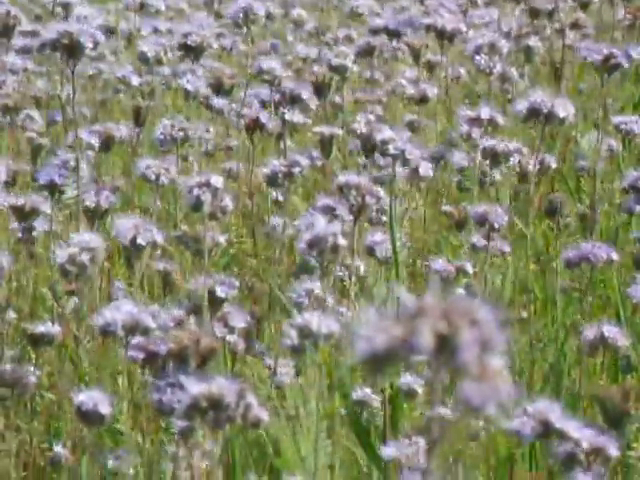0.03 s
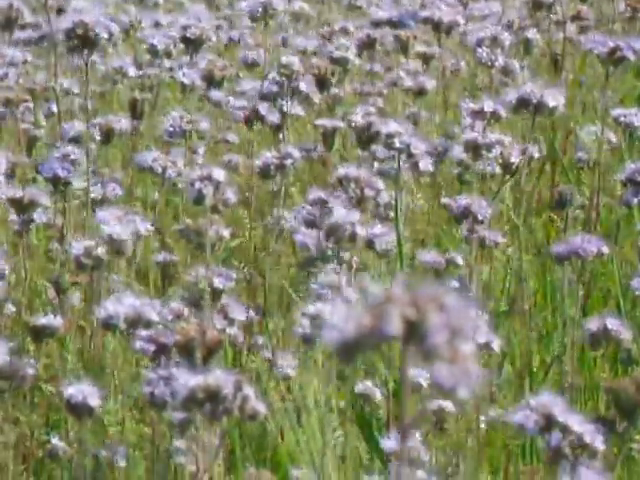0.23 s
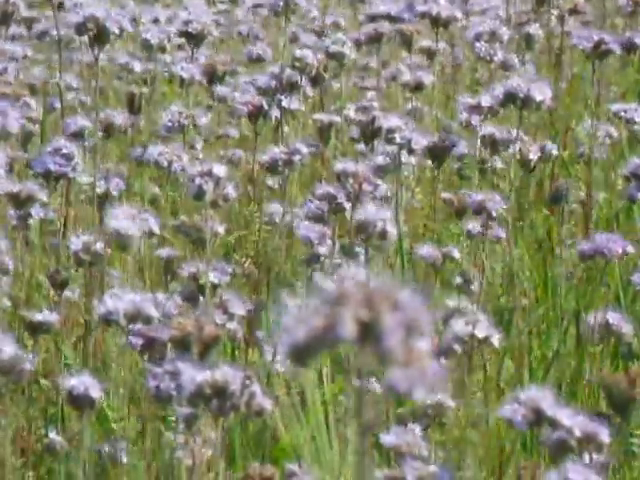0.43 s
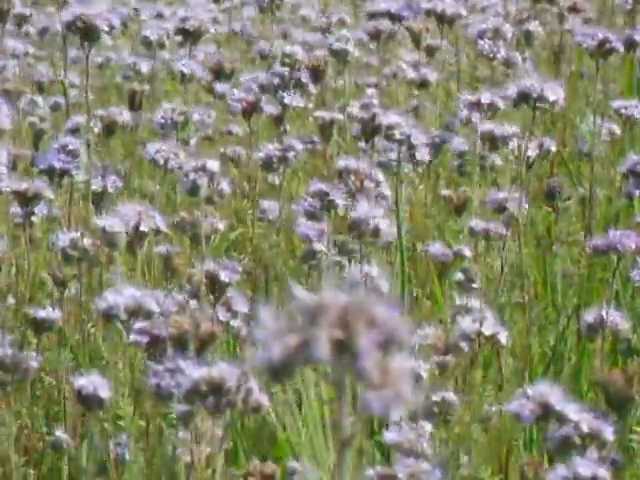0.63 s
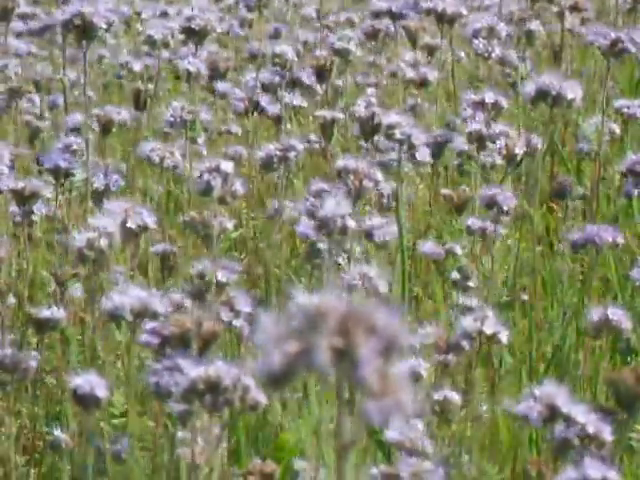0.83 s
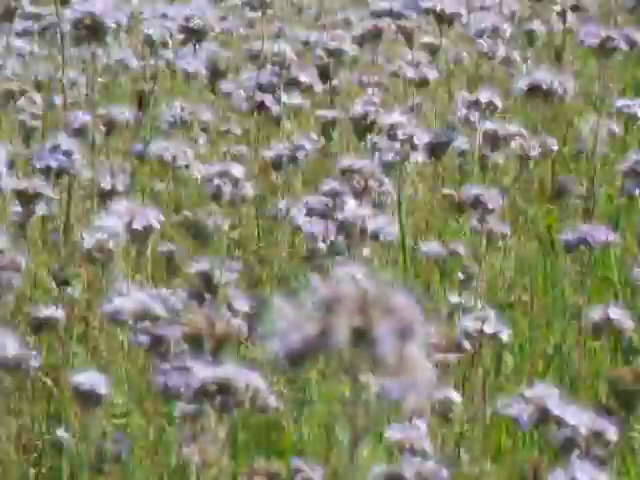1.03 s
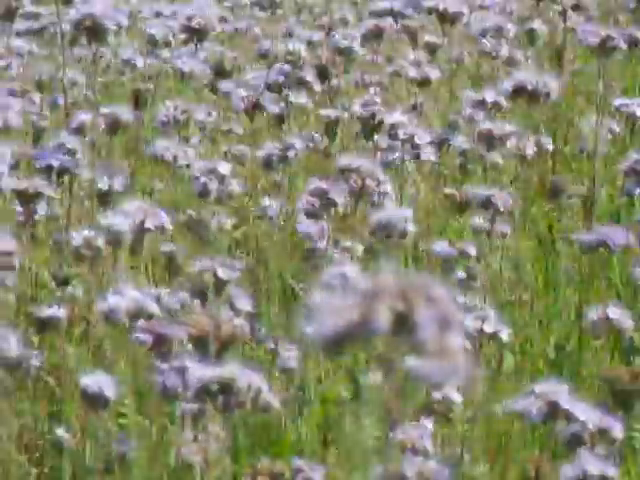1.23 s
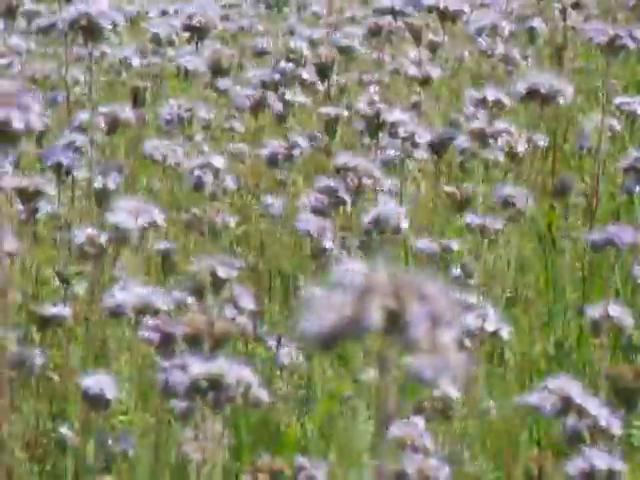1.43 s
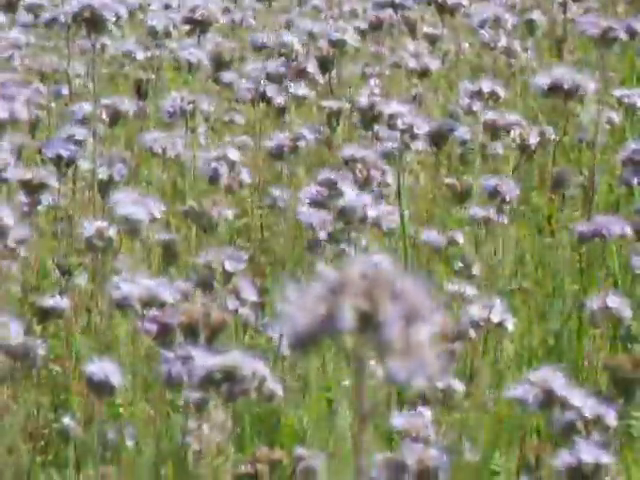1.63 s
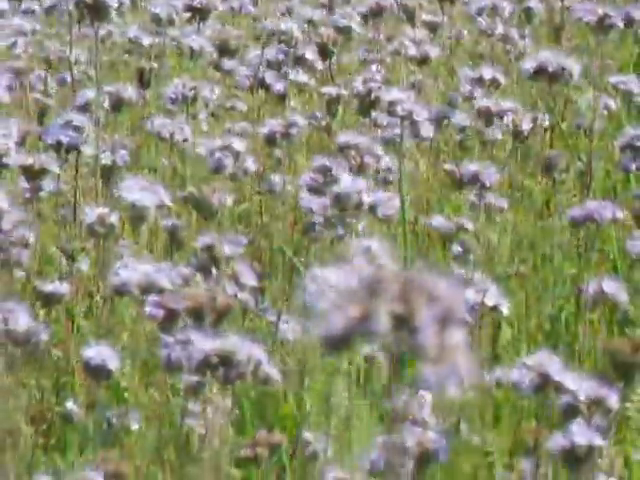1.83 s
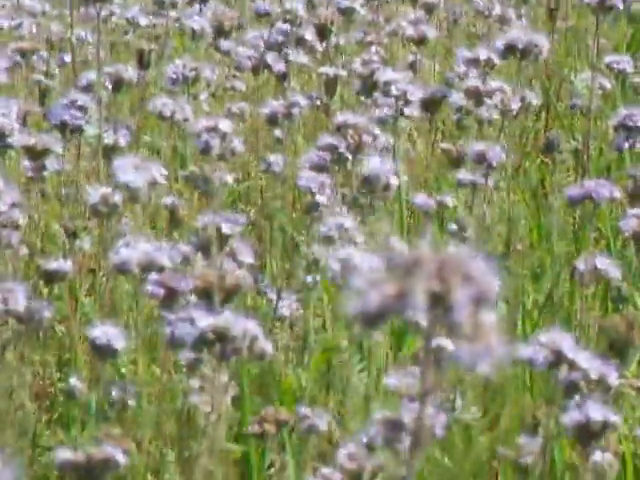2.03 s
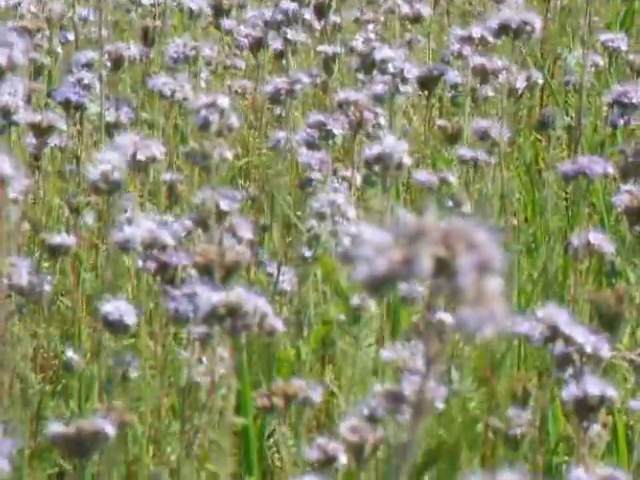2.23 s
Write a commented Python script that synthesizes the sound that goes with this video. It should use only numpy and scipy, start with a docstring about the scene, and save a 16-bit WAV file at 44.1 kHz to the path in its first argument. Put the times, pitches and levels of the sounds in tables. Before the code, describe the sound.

A small motor buzzes close by, speeding up, with wind thumping on the microphone.

```python
"""In a flower field a small motor, probably a camera's zoom drive, buzzes close to the microphone.
It clicks on, spins up and later speeds up again. One knock per turn drives the housing at harmonics
of the turning rate, strongest near 900 Hz, while the gears hiss, rasp, tick and faintly squeak.
Wind eddies thump on the microphone, hardest at the start, over a rumble and a faint outdoor hiss."""
import sys
import numpy as np
from scipy import signal
from scipy.fft import rfft, irfft, next_fast_len
from scipy.io import wavfile
from scipy.ndimage import uniform_filter1d

SR = 44100
rng = np.random.default_rng(int(sys.argv[2]) if len(sys.argv) > 2 else 0)


def generate_wav(signal):
    """Clip the signal to [-1, 1] and save it as 16-bit WAV at the path in sys.argv[1]."""
    frames = np.transpose(np.atleast_2d(signal))
    scaled = np.clip(frames, -1, 1) * 32767
    pcm = np.round(scaled).astype(np.int16)
    wavfile.write(sys.argv[1], SR, pcm)


N = 101429

# open-air spectrum: f/Hz, relative level/dB
AIR_SPECTRUM = [(100, -11), (250, 5.5), (500, 2), (900, 2), (1500, -4), (3000, -5), (6500, -7.5),
                (8000, -14), (10000, -31)]
# wind rumble: t/s, level/dB
RUMBLE_LEVEL = [(0, -40), (.16, -48), (.25, -33.5), (.5, -34), (.62, -38), (.78, -51), (1.05, -46),
                (1.35, -54.5), (1.52, -51), (1.7, -50), (1.95, -42), (2.05, -52), (2.3, -49.5)]
# rumble spectrum: f/Hz, relative level/dB
RUMBLE_SPECTRUM = [(15, -4.5), (45, 0), (90, -2), (160, -7.5), (300, -21), (600, -35), (1500, -64)]
# eddies: peak t/s, level/dB, attack/s, decay/s, upper edge f/Hz
EDDIES = [(.235, -14.5, 0.01, 0.019, 383), (0.26, -17.5, 0.0061, 0.0094, 610),
          (0.31, -21, 0.052, 0.023, 352), (0.416, -30, 0.028, 0.037, 300), (0.464, -19.5, 0.018, .02, 350),
          (.531, -24.5, 0.0059, 0.0081, 230), (0.679, -40, 0.022, 0.069, 160),
          (.735, -33, 0.038, 0.013, 174), (0.778, -29, 0.014, 0.024, 194.4), (.94, -42, 0.026, 0.056, 176),
          (1.402, -33.5, 0.0073, 0.02, 167), (1.655, -35.5, 0.018, 0.027, 171),
          (1.815, -32.5, 0.0083, .018, 224.5), (1.91, -45, 0.036, 0.022, 220)]
# gear hiss: t/s, level/dB
HISS_LEVEL = [(.33, -57), (.45, -52), (.53, -47), (.6, -45.5), (.9, -45.5), (1.25, -45), (1.38, -49.5),
              (1.5, -44), (1.9, -41.5), (2.05, -44), (2.3, -45.5)]
# hiss spectrum: f/Hz, relative level/dB
HISS_SPECTRUM = [(710, -34), (1200, -9), (1320, -8.5), (1730, -3.5), (2080, -9.5), (2440, -7.5), (2600, -6),
                 (2840, -3.5), (3940, -1.5), (4420, -6.5), (5050, -3.5), (5770, -3), (6770, -2.5),
                 (8910, -20), (10000, -38.5), (13000, -76), (22000, -120)]
# turning rate, starting and then running: t/s, f/Hz
STARTING_RATE = [(.335, 40), (.37, 44), (.41, 52), (.445, 60), (.48, 73), (.52, 82)]
RUNNING_RATE = [(0.56, 87.4), (0.612, 90.2), (0.68, 90.9), (0.728, 90.6), (0.97, 90.7), (1.052, 91.9),
                (1.106, 91.0), (1.168, 103.0), (1.218, 102.9), (1.286, 114.4), (1.338, 114.6),
                (1.42, 123.3), (1.488, 123.1), (1.576, 129.3), (1.654, 128.8), (1.746, 134.0),
                (1.808, 132.1), (1.938, 134.4), (2.022, 128.7), (2.122, 128.5), (2.224, 122.9),
                (2.3, 121.5)]
# knock strength: t/s, relative level/dB
KNOCK_LEVEL = [(.35, -12.5), (.39, -4.5), (.44, -6.5), (.6, -4.5), (1.1, -3), (1.3, -3), (1.5, -2),
               (1.65, -1.5), (1.8, 1), (1.95, -1), (2.05, -.5), (2.3, -3.5)]
# knock harmonics 2, 3, 4 ... of the turning rate: relative level/dB
KNOCK_HARMONICS = [-5, -0.5, 2, 4, 2, -1.5, 2, 1, 0, 1, 2, 1.5, -8, -1.5, -4, -7, -5, -7.5, -9, -8.5, -12.5,
                   -13.5, -8]
# housing response: f/Hz, relative level/dB
HOUSING_RESPONSE = [(180, -20), (270, -8), (360, -17), (455, -11), (545, -18), (640, -5.5), (730, -5.5),
                    (810, 4), (860, 0.5), (920, 7.5), (995, 4), (1085, -11), (1180, -17.5), (1340, -14),
                    (1500, -21.5), (2500, -38)]
# tooth rasp: t/s, level/dB
RASP_LEVEL = [(.35, -62.5), (.6, -56), (1.15, -53.5), (1.36, -47), (1.46, -44), (1.9, -47.5), (2.1, -46),
              (2.3, -48)]
# gear resonances: f/Hz, nominal width/Hz, relative level/dB
GEAR_RESONANCES = [(2092, 250, 5.5), (2616, 140, 3.5), (3227, 340, 3), (3930, 380, 3.5), (4895, 380, 2.5),
                   (6300, 320, -22.5)]
# mechanism clicks: t/s, level/dB, decay/s
CLICK_EVENTS = [(.351, -34, 0.002), (1.999, -28, 0.0076)]
# click spectrum: f/Hz, relative level/dB
CLICK_SPECTRUM = [(1500, -22), (3000, -10), (4200, -6), (4900, 2), (5600, 2), (6300, -10), (7500, -1),
                  (8800, -4), (9300, -18), (10000, -34)]
# ticks of a catching tooth: t/s, level/dB
CATCH_LEVEL = [(.4, -67.5), (.52, -60), (.6, -56.5), (1.25, -63), (1.5, -50.5), (1.75, -53.5), (1.97, -52),
               (2.1, -55), (2.3, -61)]
# tick spectrum: f/Hz, relative level/dB
CATCH_SPECTRUM = [(1500, -17), (3000, -3.5), (5000, 2.5), (7000, -1.5), (8500, -10.5), (10000, -29)]
# shaft hum: t/s, level/dB
HUM_LEVEL = [(.4, -92), (.65, -44), (1.0, -60.5), (1.12, -48), (1.3, -47), (1.52, -48), (1.85, -48),
             (2.05, -56), (2.3, -55)]
# housing rattle: t/s, level/dB
RATTLE_LEVEL = [(.6, -62), (1.15, -65), (1.45, -48.5), (1.62, -46.5), (1.76, -46.5), (1.9, -46.5),
                (2.02, -51.5), (2.15, -49), (2.3, -50)]
# rattle spectrum: f/Hz, relative level/dB
RATTLE_SPECTRUM = [(200, -19), (450, -12.5), (680, -7), (780, -13), (900, -0.5), (980, -5), (1080, -3.5),
                   (1250, -18), (1700, -38)]
# gear squeaks: centre t/s, centre f/Hz, level/dB, half length/s
SQUEAK_EVENTS = [(1.008, 2360, -46, 0.0072), (1.034, 2580, -49, .008), (1.092, 2990, -46.5, .009),
                 (1.301, 3620, -50, 0.028), (1.34, 1896, -51, 0.011), (1.387, 3925, -50, 0.027)]


def undb(db):
    """Amplitude ratio of a level in decibels."""
    return 10 ** (np.asarray(db) / 20)


def unit(x):
    """Normalisation to rms 1."""
    return x / np.sqrt(np.mean(x ** 2))


def curve(rows):
    """Linear interpolation of (t/s, value) rows."""
    return np.interp(np.arange(N) / SR, *np.array(rows, float).T)


def wander(rate_hz):
    """Smooth random fluctuation of rms 1."""
    hold = int(SR / rate_hz)
    steps = np.repeat(rng.standard_normal(N // hold + 1), hold)
    return unit(uniform_filter1d(steps, hold)[:N])


def colour(x, spectrum):
    """Minimum-phase filtering through (f/Hz, level/dB) points; the output has rms 1."""
    size = 2 * next_fast_len(N)
    hz, db = np.array(spectrum, float).T
    f = np.maximum(np.arange(size // 2 + 1) * SR / size, 1)
    gain = undb(np.interp(np.log(f), np.log(hz), db))
    cepstrum = irfft(np.log(gain))
    cepstrum[1:size // 2] *= 2  # folding makes the response causal
    cepstrum[size // 2 + 1:] = 0
    return unit(irfft(rfft(x, size) * np.exp(rfft(cepstrum)))[:N])


def resonate(x, hz, width_hz):
    """Two equal resonators in cascade, with gain 1 at their centre."""
    b, a = signal.iirpeak(hz, hz / width_hz, fs=SR)
    return signal.lfilter(b, a, signal.lfilter(b, a, x))


def impulses(times, sizes):
    """An impulse train, each impulse shared between neighbouring samples."""
    at = np.clip(times * SR, 0, N - 2)
    i = at.astype(int)
    return np.bincount(i, sizes * (1 - at + i), N) + np.bincount(i + 1, sizes * (at - i), N)


def open_air(level_db=-50.5):
    """Broadband noise of nearly constant level is heard as a faint outdoor hiss."""
    return colour(rng.standard_normal(N), AIR_SPECTRUM) * undb(level_db + .5 * wander(4.3))


def wind(t, edge_ratio=.17):
    """Turbulent pressure at the microphone: a rumble, and a low thump as each eddy strikes."""
    sound = colour(rng.standard_normal(N), RUMBLE_SPECTRUM) * undb(curve(RUMBLE_LEVEL) + 2 * wander(11))
    for peak, db, attack, decay, hz in EDDIES:
        lowpass = signal.butter(4, hz, fs=SR, output="sos")
        highpass = signal.butter(2, hz * edge_ratio, "high", fs=SR, output="sos")
        eddy = signal.sosfilt(highpass, signal.sosfilt(lowpass, rng.standard_normal(N)))
        eddy /= np.sqrt(uniform_filter1d(eddy ** 2, size=1300))  # even out the short-term power
        envelope = np.exp(np.where(t < peak, -((t - peak) / attack) ** 2, (peak - t) / decay))
        sound += eddy * undb(db) * envelope
    return sound


def gear_hiss(turns, depth=.79, decay_turns=.26):
    """Sliding friction makes noise, amplitude-modulated to peak as each turn begins."""
    friction = colour(rng.standard_normal(N), HISS_SPECTRUM)
    pulsing = 1 + depth * np.exp(-(turns % 1) / decay_turns)
    return unit(friction * pulsing) * undb(curve(HISS_LEVEL) + 1.17 * wander(29.32))


def shaft_turns(t, jitter=.00292):
    """Rotation, counted in turns, is the time integral of a slightly unsteady turning rate."""
    rate_hz = curve(list(STARTING_RATE) + list(RUNNING_RATE)) * (1 + jitter * wander(40))
    return np.cumsum(rate_hz * (t > STARTING_RATE[0][0])) / SR


def housing_buzz(turns, rms_db=-39):
    """Forced vibration: one knock per turn is a harmonic series, shaped by the housing's resonances."""
    knocks = sum(undb(db) * np.cos(2 * np.pi * k * turns) for k, db in enumerate(KNOCK_HARMONICS, 2))
    strength = undb(curve(KNOCK_LEVEL) - wander(60.11)) * (turns > 0)
    return undb(rms_db) * colour(knocks * strength, HOUSING_RESPONSE)


def tooth_rasp(t, turns, teeth=14, slip_s=.00004, scatter=.5):
    """Impacts of uneven teeth excite the gear resonances in a pattern that recurs on every turn."""
    places = (np.arange(teeth) + rng.random(teeth)) / teeth
    contact_turns = (np.arange(int(turns[-1]))[:, None] + places).ravel()
    slip, size = rng.standard_normal((2, len(contact_turns)))
    impacts = impulses(np.interp(contact_turns, turns, t) + slip_s * slip, 1 + scatter * size)
    rasp = sum(undb(db) * resonate(impacts, hz, 1.24 * width) for hz, width, db in GEAR_RESONANCES)
    return unit(rasp) * undb(curve(RASP_LEVEL))


def clicks(t):
    """Damped vibration of small plastic parts: bright noise bursts with exponential decay."""
    envelope = sum(undb(db) * (t >= onset) * np.exp(-np.abs(t - onset) / decay)
                   for onset, db, decay in CLICK_EVENTS)
    return colour(rng.standard_normal(N), CLICK_SPECTRUM) * envelope


def tooth_catch(turns, scatter_db=4.5, decay_turns=.13):
    """A tooth catches as each turn begins; the brief impact gives a broadband tick of random size."""
    size = undb(scatter_db * np.clip(rng.standard_normal(N), -2, 2))[turns.astype(int)]
    envelope = size * np.exp(-(turns % 1) / decay_turns) * (turns > 0)
    return colour(rng.standard_normal(N) * envelope, CATCH_SPECTRUM) * undb(curve(CATCH_LEVEL))


def shaft_hum(turns):
    """Rotating imbalance exerts a sinusoidal force at the turning rate."""
    return unit(np.sin(2 * np.pi * turns)) * undb(curve(HUM_LEVEL) + wander(15))


def housing_rattle(turns, decay_turns=1):
    """Irregular vibration of the loose housing decays after each knock; it is loudest at speed."""
    shaking = rng.standard_normal(N) * np.exp(-(turns % 1) / decay_turns) * (turns > 0)
    return colour(shaking, RATTLE_SPECTRUM) * undb(curve(RATTLE_LEVEL))


def gear_squeaks(t, rise_hz_per_s=3500, waver_hz=40):
    """Friction between the gears excites brief tones that glide upward."""
    sound, waver = 0, waver_hz * wander(200)
    for centre, hz, db, half in SQUEAK_EVENTS:
        cycles = np.cumsum(hz + rise_hz_per_s * (t - centre) + waver) / SR
        envelope = np.exp(-((t - centre) / half) ** 2)
        sound += undb(db) * unit(np.sin(2 * np.pi * cycles)) * envelope
    return sound


def scene():
    """Superposition: the pressures of all sources add at one microphone."""
    t = np.arange(N) / SR
    turns = shaft_turns(t)
    motor = housing_buzz(turns) + housing_rattle(turns) + shaft_hum(turns)
    gears = tooth_rasp(t, turns) + gear_hiss(turns) + tooth_catch(turns) + gear_squeaks(t)
    return (motor + gears + clicks(t) + wind(t) + open_air())[None]


def record(dry):
    """Band limiting: the camera acts as a steep low-pass filter at 9600 Hz."""
    return signal.sosfilt(signal.ellip(8, .2, 70, 9600, fs=SR, output="sos"), dry)


dry = scene()
out = record(dry)
generate_wav(out)
```